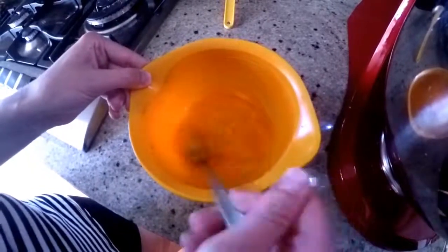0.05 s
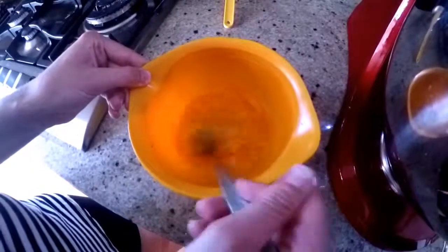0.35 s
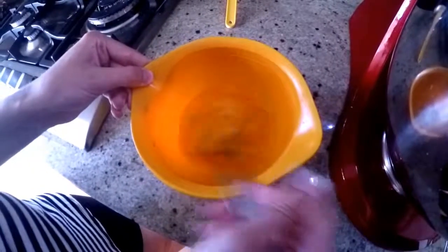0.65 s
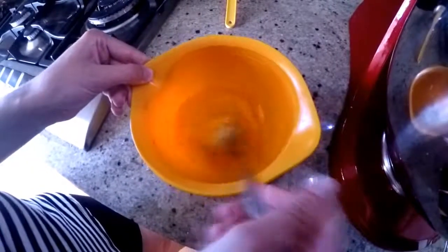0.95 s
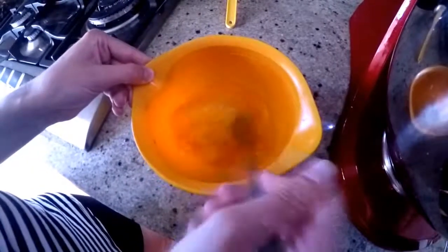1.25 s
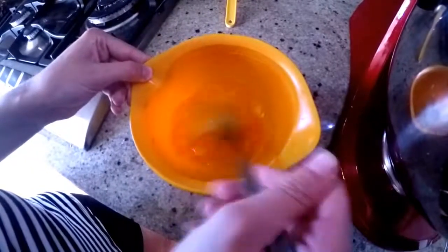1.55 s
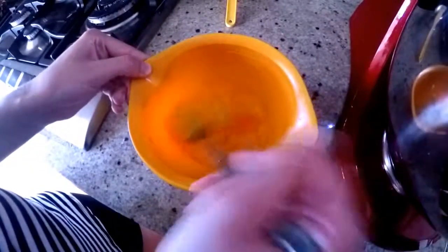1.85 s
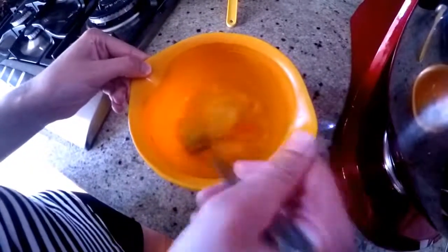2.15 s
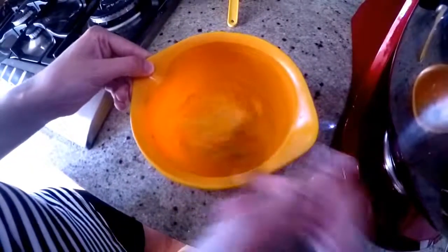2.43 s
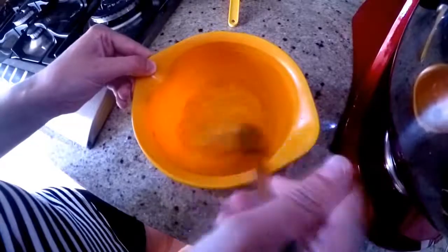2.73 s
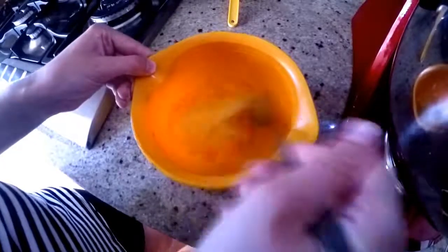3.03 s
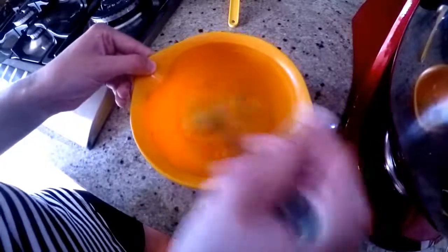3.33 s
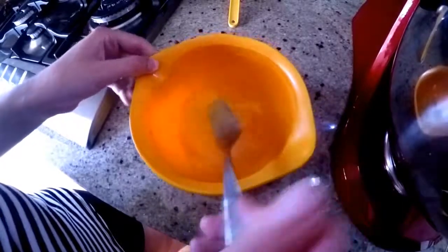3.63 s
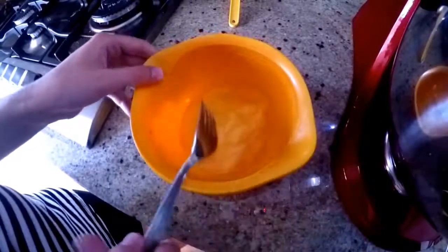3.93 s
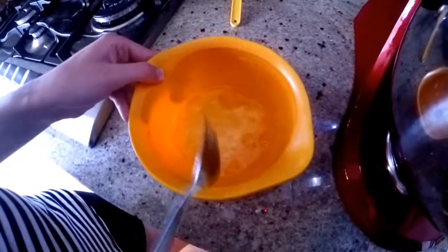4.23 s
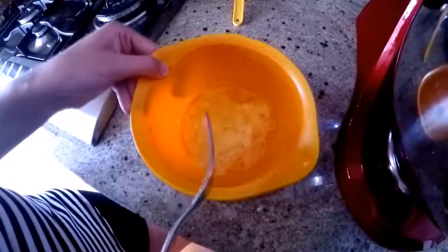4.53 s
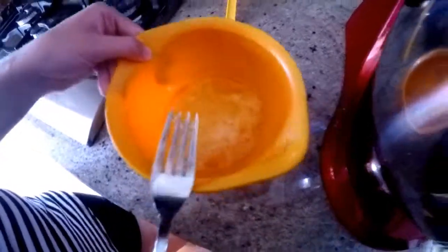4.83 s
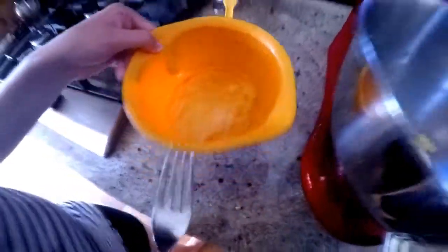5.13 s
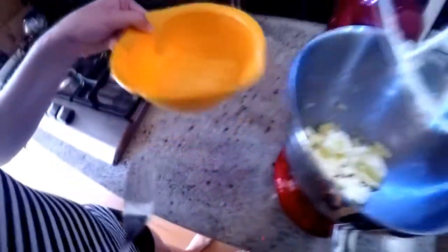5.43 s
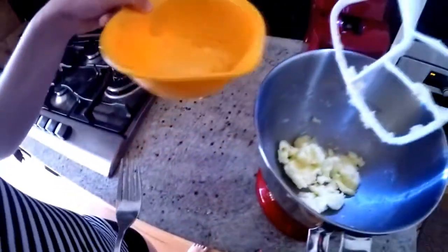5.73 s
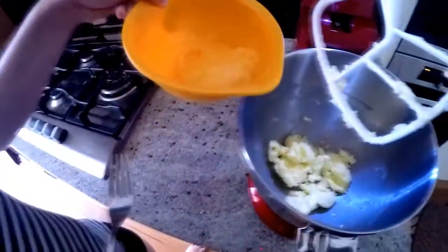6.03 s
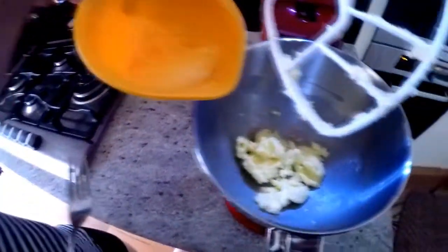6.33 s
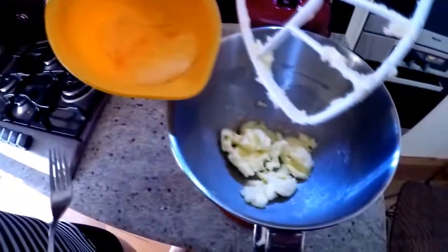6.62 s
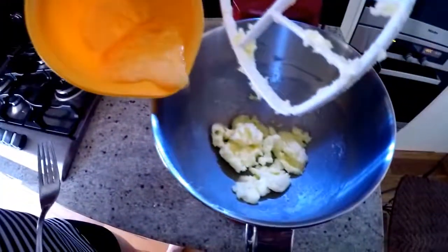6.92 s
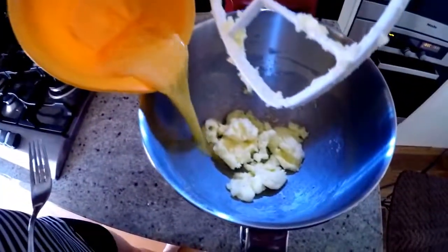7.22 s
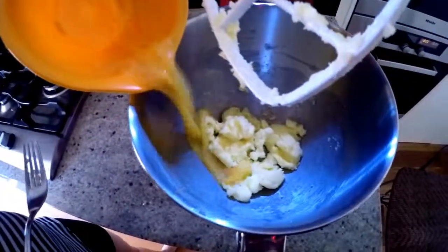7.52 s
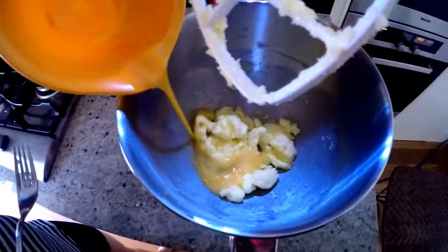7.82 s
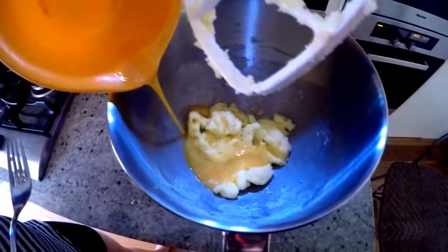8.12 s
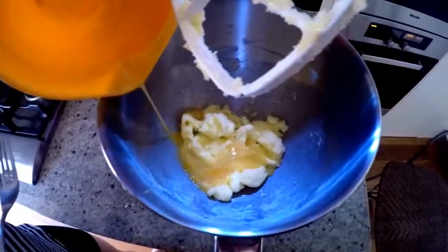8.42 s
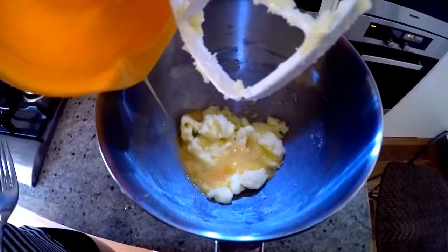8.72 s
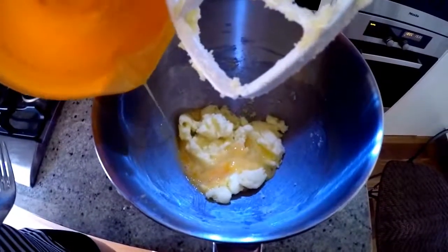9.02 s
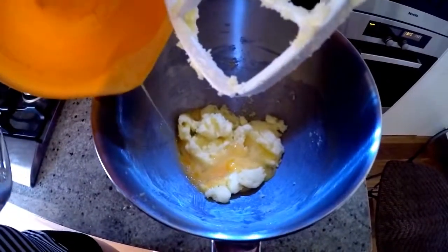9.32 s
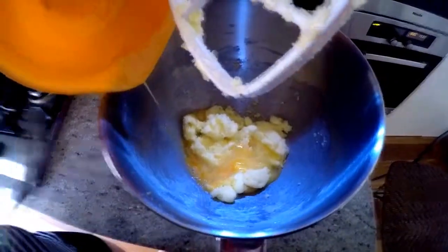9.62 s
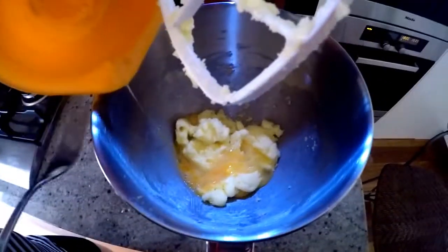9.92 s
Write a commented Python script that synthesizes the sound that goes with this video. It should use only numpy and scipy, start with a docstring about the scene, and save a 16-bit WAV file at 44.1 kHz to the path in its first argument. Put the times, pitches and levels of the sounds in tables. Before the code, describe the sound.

From the start, a fork beats eggs in a plastic bowl, close by, at about six strokes a second. Each stroke is a hollow clack with a wet, frothy swish and a small squelch. The beating stops at about 3.5 seconds with a couple of dull thumps. Two small drips follow, and from 4 to 4.8 seconds the fork taps the rim, sharpest at 4.3 and 4.5 seconds. Everything afterwards is much quieter. A faint, thin metal scrape comes near 5 seconds, followed by a soft thump and light bumps. At 6.1 seconds the plastic bowl knocks a steel mixing bowl, which rings gently. Between 7.3 and 7.7 seconds poured egg lands with soft sticky ticks and plops. A hollow knock at 8.6 seconds leads to a few lighter ones until about 10 seconds. A low appliance hum and slight kitchen reverberation run throughout.

```python
"""A fork clacks and swishes through eggs in a plastic bowl, six strokes a second, in a kitchen.
Each impact excites the bowl's damped modes, while air cavities in the churned egg resonate as wet notes.
The fork is tapped clean on the rim; then the bowl knocks a steel mixing bowl into ringing as the egg
is poured in, drop by drop. Reflections follow every sound, over a low hum and rumble."""
import sys
import numpy as np
from scipy import signal
from scipy.fft import rfft, irfft
from scipy.io import wavfile

SR = 44100
rng = np.random.default_rng(int(sys.argv[2]) if len(sys.argv) > 2 else 0)


def put_to_file(sound):
    """Save the sound as 16-bit audio at rate SR, in the file named by the first command-line argument."""
    columns = np.atleast_2d(sound).T  # one column per channel
    safe = np.clip(columns, -1, 1)
    whole_steps = np.round(safe * 32767)
    wavfile.write(sys.argv[1], SR, whole_steps.astype(np.int16))


N = 439236

# Bending modes of the tines: pitch_hz, gain_db, t60_s
TINE_MODES = [(3713, 2, .035), (4040, 6.5, .035)]
# Knocks of the fork on bare plastic: start_s, level_db, body_db, edge_db
FORK_TAPS = [(.0625, -16.5, -8.5, -21.5), (1.0169, -19.5, -6.5, -19), (3.1042, -28, 4.5, 8.5),
             (3.4386, -26, -3, -2), (4.054, -28.5, 6.5, -6), (4.0751, -37.5, 6.5, -5),
             (4.0864, -39, 5, -7.5), (4.1485, -39.5, 8, -23.5), (4.1554, -45.5, 15, -22.5),
             (4.1769, -47, 3.5, -27.5), (4.2788, -51.5, 13.5, -25.5), (4.3252, -14, -8.5, -17.5),
             (4.4821, -16, -14, -21.5), (4.6906, -36, 6, -4), (4.8133, -41.5, 5, -6.5), (4.822, -50, 5, -1)]
# Beating strokes: start_s, flick_time_s, length_s, clack_db, firmness_db, swish_db, glug_db, pocket_hz
FORK_STROKES = [(.063, 0.0997, 0.091, -26.5, -14.5, -19, -36, 2860),
                (.2352, 0.253, 0.073, -26.5, -16, -21.5, -44, 2180),
                (.3737, .419, 0.081, -26, -14, -25.5, -31.5, 2820),
                (.538, 0.584, 0.079, -26.5, -16, -26, -40.5, 1940),
                (.696, 0.756, 0.09, -22.5, -11.5, -21.5, -31, 2090),
                (.8558, 0.907, 0.076, -27, -4.5, -22, -36.5, 2020),
                (1.0169, 1.0738, 0.053, -38, -10.5, -26, -31, 2680),
                (1.154, 1.219, .094, -22, -10, -23, -38, 2020),
                (1.3346, 1.373, 0.066, -23, -10.5, -18, -45, 2020),
                (1.4938, 1.5498, 0.058, -22, -8.5, -20.5, -29.5, 2100),
                (1.67, 1.718, 0.067, -30, -17.5, -24, -34.5, 1930),
                (1.8306, 1.8745, 0.076, -25.5, -2, -21, -38, 2000),
                (2.0129, 2.0526, 0.047, -20.5, -9.5, -21, -36, 1950),
                (2.1603, 2.218, 0.047, -21, -4, -24, -29.5, 2780),
                (2.3241, 2.3861, .05, -31, -13.5, -23, -49, 2040),
                (2.4636, 2.525, 0.098, -20.5, -4, -18.5, -38.5, 2940),
                (2.6428, 2.6963, 0.068, -19.5, -18, -21, -33.5, 2050),
                (2.7951, 2.8601, 0.056, -27, -10.5, -21.5, -37, 2020),
                (2.9577, 3.009, 0.083, -24.5, -9, -24, -41, 2030),
                (3.1478, 3.175, 0.057, -19, -11.5, -22.5, -32.5, 2150),
                (3.324, 3.336, 0.048, -39, -19.5, -24.5, -39.5, 1834)]
def fork():
    """Impact: tines clack through the egg and flick the far wall; on bare plastic they ring and rebound."""
    out = np.zeros(N)
    through_egg_db, bare_plastic_db = (-2, -2, 1.5), (-3.5, 2, 8.5)  # thud, hollow, clink
    flick = registers(body_db=-18, edge_db=-12.5, tint_db=through_egg_db)
    for start_s, flick_s, _, clack_db, firmness_db, swish_db, _, _ in FORK_STROKES:
        clack = registers(firmness_db, 3.5 + .99 * firmness_db, through_egg_db)  # firmer is brighter
        add(out, start_s, blow(clack_db, clack, crack_s=.0024, rattle_db=-11.5, modes_db=-30.5))
        add(out, flick_s, blow(swish_db - 2, flick, crack_s=.0025, rattle_db=-12.5, modes_db=-31))
    for start_s, level_db, body_db, edge_db in FORK_TAPS:
        tap = registers(body_db, edge_db, bare_plastic_db)
        add(out, start_s, amp(level_db + edge_db) * ring(TINE_MODES, clock(.1), detune=.01))
        for delay_s, db in [(0, level_db), (.0085, level_db - 19.5)]:  # springy tines strike twice
            knock = blow(db, tap, crack_s=.0022, rattle_db=-15, rattle_s=.008, modes_db=-35)
            add(out, start_s + delay_s, knock)
    return out


def registers(body_db, edge_db, tint_db):
    """Spectral balance of a contact, in dB: body lifts the two low bands, edge the two high ones."""
    thud_db, hollow_db, clink_db = tint_db
    return body_db + thud_db, body_db + hollow_db, 0, clink_db + .55 * edge_db, edge_db


# Limits of the thud, hollow, middle, clink and tick bands: edge_hz
REGISTER_EDGES = [120, 550, 1300, 2900, 5200, 15500]
# Modes of the plastic bowl: pitch_hz, gain_db, t60_s
PLASTIC_MODES = [(310, -3.5, .14), (395, -6.5, 0.25), (525, 0.5, 0.15), (772, -3, 0.21), (810, -0.5, .15),
                 (1058, -1.5, .17), (1133, -4, .1), (1827, 3, .13), (2059, -0.5, 0.2), (2440, -6.5, .12),
                 (2850, -3, .14), (3054, 2.5, .13), (3386, 0, .2), (3960, 4, .1), (6060, -5, .14)]
# Spectrum of a blow on plastic: frequency_hz, gain_db
BLOW_SPECTRUM = [(150, -8), (300, 5), (430, -5), (600, 0), (900, 5), (1100, -2.5), (1400, -8.5), (1900, 7),
                 (3000, -3), (4100, 0), (5100, -13.5), (6300, -1.5), (8500, -12), (14500, -21)]
def blow(level_db, registers_db, crack_s, rattle_db, modes_db, rattle_s=.011, spectrum=BLOW_SPECTRUM):
    """Impulse response of the bowl: a crack, its scatter round the wall, and the plastic's modes."""
    t = clock(.2)
    decay = np.exp(-t / crack_s) + amp(rattle_db) * np.exp(-t / rattle_s)
    rise = 1 - np.exp(-t / .0004)
    crack = colour(decay * rise * rng.choice([-1, 1], len(t)), spectrum)
    strike = crack + amp(modes_db) * ring(PLASTIC_MODES, t, detune=.0044)
    out, attack_samples = np.zeros(len(t)), int(.011 * SR)
    # Where and how flat the blow lands sets the weight of each band.
    for lo_hz, hi_hz, db in zip(REGISTER_EDGES, REGISTER_EDGES[1:], registers_db):
        damping = np.exp(-t * (lo_hz / 650) ** 2)  # plastic damps the treble first
        part = band(strike, lo_hz, hi_hz, order=4) * damping
        out += amp(level_db + db) * part / np.std(part[:attack_samples])
    return out


# Swish on entry, relative to its crest; loosened egg churns at once: time_s, gain_db
ENTRY_GAIN = [(0, -6), (1.2, -3), (1.5, -3), (3.3, 1.5)]
def eggs():
    """Air entrainment: an opening wash dies away, each stroke swishes, and foam pops in between."""
    t = np.arange(N) / SR
    out = amp(-41 - 140 * np.minimum(t, 2)) * unit(colour(rng.standard_normal(N), CHURN_SPECTRUM))
    for start_s, _, length_s, _, _, swish_db, glug_db, pocket_hz in FORK_STROKES:
        entry_db = swish_db + np.interp(start_s, *np.transpose(ENTRY_GAIN))
        spray_db = -15 + .32 * start_s  # spray grows as the egg froths
        times_s = start_s - .002, start_s + .54 * length_s, start_s + length_s
        add(out, start_s, swish(*times_s, entry_db, swish_db, glug_db, spray_db, pocket_hz))
    beating = np.interp(t, [0, 3.3, 3.6], [1, 1, 0])
    foam = colour(crackle(N, per_s=40, spread_db=9), SPRAY_SPECTRUM)
    return out + amp(-56) * beating * foam


# Spectra of churned egg, its fine spray and its heavy fold: frequency_hz, gain_db
CHURN_SPECTRUM = [(150, -24.5), (400, -13.5), (1200, -10.5), (1850, 1.5), (2900, 3), (3500, -10),
                  (4100, 3.5), (5000, -15), (8000, -22), (15000, -35.5)]
SPRAY_SPECTRUM = [(2000, -23.5), (5000, -5), (6100, 5.5), (7300, -6), (9300, -15), (10600, -5.5),
                  (12300, -10), (15000, -20)]
GLUG_SPECTRUM = [(120, -36.5), (240, -17), (325, 8), (440, -4.5), (560, -1.5), (720, -7), (980, -2.5),
                 (1300, -12), (2200, -41)]
def swish(start_s, crest_s, end_s, entry_db, crest_db, glug_db, spray_db, pocket_hz):
    """Cavity resonance: amid froth, an air pocket behind the tines rises in pitch, opens and falls."""
    length_s = end_s - start_s
    t = start_s + clock(length_s + .03)
    n = len(t)
    knots_s = [start_s, start_s + .014, crest_s - .008, crest_s + .0078, end_s, end_s + .023]
    knots_s = np.maximum.accumulate(knots_s)
    force_db = [entry_db - 7.5, entry_db, crest_db, crest_db - .5, crest_db - 15.5, crest_db - 45]
    force = amp(np.interp(t, knots_s, force_db))
    froth = wall_echo(colour(crackle(n, per_s=2500, spread_db=6.5), CHURN_SPECTRUM))
    glide_hz = pocket_hz * np.interp(t, knots_s, [.85, .98, 1.08, 1.03, .78, .7])
    glide_hz *= 1 + .019 * wobble(n, 20, 110)
    pocket = resonate(crackle(n, per_s=3000, spread_db=11), glide_hz, width_hz=130)
    pocket = unit(resonate(pocket, glide_hz, width_hz=400))
    spray = wall_echo(colour(crackle(n, per_s=900, spread_db=5), SPRAY_SPECTRUM))
    bubbles, fizz = np.zeros((2, n))
    for when, pitch, life in rng.random((8, 3)):
        add(bubbles, when * length_s, bubble(1600 * 2.8 ** pitch, cycles=7 + 12 * life, glide=.011))
    for when, pitch, life in rng.random((12, 3)):
        ping = bubble(5600 * 2.2 ** pitch, cycles=10 + 20 * life, glide=.01)
        add(fizz, when * length_s, amp(-8 * pitch) * ping)
    wet = amp(-6.5) * froth + amp(-9) * pocket + amp(-10.5) * unit(bubbles)
    mist = amp(spray_db) * (spray + amp(-10) * unit(fizz))
    # The heavy fold of egg slaps down ahead of the crest.
    fold = amp(np.interp(t, knots_s, [-8.5, -.5, -7, -3.5, -12, -39.5]))
    glug = unit(colour(crackle(n, per_s=660, spread_db=6.5), GLUG_SPECTRUM))
    return force * (wet + mist) + amp(glug_db) * fold * glug


def wall_echo(x):
    """Comb filtering: an echo off the bowl wall, by a different path each stroke, hollows the sound."""
    lag = int(SR * rng.uniform(.00015, .0011))
    return unit(x + .63 * rng.choice([-1, 1]) * np.roll(x, lag))


def bubble(hz, cycles, glide):
    """Damped oscillation: a small air cavity rings for some cycles while its pitch slides."""
    age = clock(4 * cycles / hz) * hz / cycles
    envelope = (1 - np.exp(-6 * age)) * np.exp(-age)
    return envelope * np.sin(2 * np.pi * cycles * age * (1 + glide * age))


def spits():
    """Film rupture: froth bursts at the tine tips, starting just before each clack."""
    out, lead_s = np.zeros(N), .007
    n = int(2 * lead_s * SR)
    for start_s, *_ in FORK_STROKES:
        level_db = -44 + 6.5 * rng.uniform(-1, 1)
        spray = unit(colour(rng.standard_normal(n), SPRAY_SPECTRUM))
        add(out, start_s - lead_s, amp(level_db) * np.hanning(n) * spray)
    return out


# Air cavities that sing as they open, relative to the swish: pitch_hz, gain_db
CAVITY_NOTES = [(980, -12.5), (2000, -1.5), (2800, -3), (4000, -4)]
def squelches():
    """Cavity resonance: each size sings once a stroke; the trough closes with a falling gulp."""
    out = np.zeros(N)
    squelch_half_s, gulp_half_s = .013, .02
    for start_s, _, length_s, _, _, swish_db, _, _ in FORK_STROKES:
        for hz, db in CAVITY_NOTES:
            strength, pitch, slide = np.clip(rng.standard_normal(3), -1.5, 1.5)
            squelch = cavity_note(hz * (1 + .014 * pitch), slide=.05 * slide, half_s=squelch_half_s)
            centre_s = start_s + rng.uniform(.19, .64) * length_s
            add(out, centre_s - squelch_half_s, amp(swish_db + db + 4 * strength) * squelch)
        strength, pitch = rng.uniform(-1, 1, 2)
        gulp = cavity_note(1717 * (1 + .08 * pitch), slide=-.27, half_s=gulp_half_s)
        add(out, start_s + .91 * length_s - gulp_half_s, amp(swish_db - 9 + 7.5 * strength) * gulp)
    return out


def cavity_note(hz, slide, half_s):
    """Amplitude modulation: thick egg makes a cavity's sliding note flutter as it swells and fades."""
    t = clock(2 * half_s) - half_s
    envelope = np.cos(np.pi / 2 * t / half_s) ** 4
    flutter = unit(1 + .62 * wobble(len(t), 30, 160, order=2))
    glide_hz = hz * (1 + slide * t / half_s)
    return envelope * flutter * np.sin(2 * np.pi * np.cumsum(glide_hz) / SR)


# Modes of the plastic rim and of the steel bowl: pitch_hz, gain_db, t60_s
RIM_MODES = [(1067, 3.5, 0.047), (1134, -10, 0.091)]
STEEL_MODES = [(438, 0.5, 0.56), (642, -6.5, 1.5), (864, -2, 0.75), (1010, -2, 0.52), (1070, -15, 0.61),
               (1220, -16, 0.86), (1280, -19, 0.82), (1670, -9, 0.42), (4420, -7, 0.28)]
# Spectrum of the plastic bowl's side bumping the steel one: frequency_hz, gain_db
BUMP_SPECTRUM = [(220, -5), (420, 4.5), (520, -9.5), (740, 10), (900, 7), (1080, 3.5), (1230, -10.5),
                 (3300, -2), (14000, -40)]
# Bumps between the bowls: start_s, level_db, body_db, edge_db, steel_db
BOWL_KNOCKS = [(5.1257, -52, -12.5, -14.5, -72), (5.3288, -50.5, 4, -17, -85),
               (5.3953, -55, -15, -31.5, -83), (5.6074, -41, -29, -24, -84), (6.1458, -44.5, 3, -6, -48),
               (6.3819, -60, 5.5, -8, -63), (8.3532, -53, -4, -29.5, -83), (8.6029, -34.5, 14.5, -8.5, -58),
               (8.6154, -42.5, 8, -20, -85.5), (8.9786, -39.5, -6.5, -20, -58.5), (9.246, -49, 9, -1, -58),
               (9.3252, -50, -2.5, -45, -82), (9.8826, -48.5, -4, -32.5, -82)]
def bowl_knocks():
    """Free vibration: after a bump the plastic rim dies quickly; the lightly damped steel rings on."""
    out, t = np.zeros(N), clock(1.2)
    for start_s, level_db, body_db, edge_db, steel_db in BOWL_KNOCKS:
        balance = registers(body_db, edge_db, tint_db=(-6, -1.5, 5.5))
        add(out, start_s, blow(level_db, balance, crack_s=.0031, rattle_db=-20.5, rattle_s=.0085,
                               modes_db=-39, spectrum=BUMP_SPECTRUM))
        add(out, start_s, amp(level_db + body_db) * ring(RIM_MODES, t, detune=0))
        add(out, start_s, amp(steel_db) * ring(STEEL_MODES, t, detune=0))
    return out


# Envelope of the sliding steel bowl: time_s, level_db
SCRAPE_ENVELOPE = [(4.85, -90), (4.95, -64), (5.1, -64.5), (5.14, -50.5), (5.17, -93)]
def scrape():
    """Friction: the steel bowl slides round with a faint, thin noise."""
    friction = band(crackle(N, per_s=1800, spread_db=4.5), 2900, 4000, order=2)
    return swell(SCRAPE_ENVELOPE) * unit(friction)


# Large drops of egg, off the fork and then onto butter: start_s, level_db, pitch_hz
EGG_DROPS = [(3.7463, -39.5, 3091), (3.935, -42.5, 2400), (7.2826, -39, 6000), (7.31, -42, 2220),
             (7.3486, -45, 2590), (7.4917, -46, 6450), (7.6098, -40, 1820), (7.638, -45, 6500),
             (7.6814, -42, 3720), (8.459, -46.5, 1644)]
def drips():
    """Drop impact: each lands with a sticky tick, a bubble's plop and a brief crackle of foam."""
    out, t = np.zeros(N), clock(.05)
    for start_s, db, hz in EGG_DROPS:
        tick = band(rng.standard_normal(len(t)) * np.exp(-t / .002), hz / 2, 2 * hz, order=2)
        foam = band(crackle(len(t), per_s=400, spread_db=1), 2800, 11000, order=2) * np.exp(-t / .018)
        add(out, start_s, amp(db) * (tick + amp(-17) * foam))
        add(out, start_s, amp(db - 4) * bubble(hz, cycles=6, glide=.012))
    return out


# Envelope of the pour's fine spatter: time_s, level_db
SPATTER_ENVELOPE = [(7.2, -94.5), (7.3, -63.5), (7.45, -74.5), (7.63, -69.5), (7.9, -76), (8.6, -94)]
def spatter():
    """Shot noise: tiny foam bubbles burst at random as the stream of egg lands."""
    bursts = band(crackle(N, per_s=120, spread_db=7.5), 2040, 9500, order=2)
    return swell(SPATTER_ENVELOPE) * unit(bursts)


# Dull thumps of the bowls on worktop and mixer: start_s, level_db, pitch_hz, decay_s
BOWL_THUMPS = [(3.106, -18, 185, 0.0095), (3.44, -30, 202, .02), (4.053, -27, 96.2, .04),
               (4.151, -24, 135, 0.023), (4.327, -28.5, 147, 0.033), (5.328, -17, 67, 0.0096),
               (6.144, -34, 225.4, 0.018)]
def worktop():
    """Structure-borne sound: the bowl's foot passes on a few firm thumps and a soft push per stroke."""
    out, t = np.zeros(N), clock(.25)
    pushes = [(start_s + .008, clack_db - 7 + .37 * firmness_db, rng.uniform(85, 150), .035)
              for start_s, _, _, clack_db, firmness_db, *_ in FORK_STROKES]
    for start_s, db, hz, decay_s in BOWL_THUMPS + pushes:
        envelope = np.exp(-t / decay_s) - np.exp(-t / .0044)
        add(out, start_s, amp(db) * envelope * np.sin(2 * np.pi * hz * t))
    return out


# Echoes from the mixer, worktop and wall: delay_s, gain_db
EARLY_ECHOES = [(.0021, -27), (.0097, -19), (0.0105, -20)]
def with_echoes(x):
    """Early reflection: nearby surfaces add delayed, weaker copies to the direct sound."""
    out = x.copy()
    for delay_s, db in EARLY_ECHOES:
        add(out, delay_s, amp(db) * x)
    return out


# Reverberation time of the kitchen: frequency_hz, t60_s
REVERB_TIME = [(150, .5), (600, 0.7), (2000, 1.07), (4000, 0.7), (8000, 0.3), (15000, 0.25)]
# Spectrum of its reverberation: frequency_hz, gain_db
REVERB_SPECTRUM = [(150, -8.5), (600, -15.5), (2000, -17.5), (4000, -19), (8000, -15.5), (15000, -20)]
def kitchen(x):
    """Reverberation: sparse reflections die away exponentially, each band at its own rate."""
    t = clock(.9)
    taps = rng.choice([-1, 1], len(t)) * (rng.random(len(t)) < 4000 / SR) * (t > .006)
    hz, frame_s, bands = signal.stft(taps, SR, nperseg=256)
    t60_s = read(REVERB_TIME, hz)[:, None]
    bands *= amp(read(REVERB_SPECTRUM, hz)[:, None] - 60 * frame_s / t60_s)
    bands *= np.sqrt(np.log(1e6) / t60_s)  # a longer decay carries no extra energy
    tail = signal.istft(bands, SR, nperseg=256)[1] / np.sqrt(SR * np.mean(taps ** 2))
    return signal.fftconvolve(x, tail)[:N]


# Spectrum of the room's air: frequency_hz, gain_db
AIR_SPECTRUM = [(14, -1), (24, 2), (32, -3), (43, -2.5), (66, -19), (140, -18), (240, -26.5), (450, -33.5),
                (700, -38), (1100, -40.5), (1600, -46.5), (3000, -50), (7000, -55), (15000, -64)]
# Tones of an appliance: pitch_hz, level_db
HUM_TONES = [(101, -55), (171.5, -57), (199.2, -67.5), (345, -67), (425.3, -77.5), (527, -70)]
def background():
    """Continuous and line spectra: room air rumbles under an appliance hum that wavers in phase."""
    t, hz = np.arange(N) / SR, np.fft.rfftfreq(N, 1 / SR)
    air = rfft(rng.standard_normal(N)) * amp(read(AIR_SPECTRUM, hz)) * (hz > 14)
    out = amp(-38.5) * unit(irfft(air, N))
    for hum_hz, db in HUM_TONES:
        out += amp(db) * np.sqrt(2) * np.sin(2 * np.pi * hum_hz * t + .7 * wobble(N, .5, 5.7))
    return out


def ring(modes, t, detune):
    """Modal superposition: decaying sines, each shifted a little by the point of contact."""
    hz, db, t60_s = np.transpose(modes)[:, :, None]
    hz = hz * (1 + detune * rng.standard_normal(hz.shape))
    polarity = rng.choice([-1, 1], hz.shape)
    return (amp(db - 60 * t / t60_s) * np.sin(2 * np.pi * hz * t) * polarity).sum(0)


def crackle(n, per_s, spread_db):
    """Poisson process: random clicks, a few of them large."""
    size = amp(spread_db * np.minimum(rng.exponential(1, n), 4))
    return unit(size * rng.choice([-1, 1], n) * (rng.random(n) < per_s / SR))


def wobble(n, lo_hz, hi_hz, order=1):
    """Random modulation: band-limited noise of rms 1."""
    return unit(band(rng.standard_normal(n), lo_hz, hi_hz, order))


def resonate(x, hz, width_hz):
    """Forced resonance whose centre follows the curve hz."""
    carrier = np.exp(2j * np.pi * np.cumsum(hz) / SR)
    pole = np.exp(-np.pi * width_hz / SR)
    return 2 * (carrier * signal.lfilter([1 - pole], [1, -pole], x / carrier)).real


def colour(x, spectrum, size=2048):
    """Minimum-phase filter with the given spectrum."""
    log_gain = np.log(amp(read(spectrum, abs(np.fft.fftfreq(size, 1 / SR)))))
    taps = np.fft.ifft(np.exp(np.conj(signal.hilbert(log_gain)))).real
    return signal.fftconvolve(x, taps)[:len(x)]


def band(x, lo_hz, hi_hz, order):
    """Causal band-pass."""
    return signal.sosfilt(signal.butter(order, [lo_hz, hi_hz], "band", fs=SR, output="sos"), x)


def swell(points):
    """Gain over the scene from (time_s, level_db) points, silent outside them."""
    time_s, db = np.transpose(points)
    return np.nan_to_num(amp(np.interp(np.arange(N) / SR, time_s, db, left=np.nan, right=np.nan)))


def read(points, hz):
    """Interpolation on a log-frequency axis."""
    points_hz, values = np.transpose(points)
    return np.interp(np.log(hz + 1), np.log(points_hz), values)


def amp(db):
    """Decibels to gain."""
    return 10 ** (np.asarray(db) / 20)


def unit(x):
    """Scales to rms 1."""
    return x / np.sqrt(np.mean(x ** 2) + 1e-20)


def clock(seconds):
    """Time axis of a given length."""
    return np.arange(int(seconds * SR)) / SR


def add(mix, start_s, sound):
    """Mixes a sound in at start_s."""
    part = mix[max(round(start_s * SR), 0):][:len(sound)]
    part += sound[:len(part)]


def scene():
    """Superposition: the sources on the worktop, their reflections and the background, in mono."""
    beating = fork() + eggs() + spits() + squelches()
    direct = beating + bowl_knocks() + scrape() + drips() + spatter() + worktop()
    return (with_echoes(direct) + kitchen(direct) + background())[None]


def record(dry):
    """Clipping and band limiting: the loudest clacks overload, then a low-pass cuts at 15.4 kHz."""
    low_pass = signal.firwin(255, 15400, window=("kaiser", 8), fs=SR)
    return signal.oaconvolve(np.clip(dry, -1, 1), low_pass[None], "same")


dry = scene()
out = record(dry)
put_to_file(out)
```